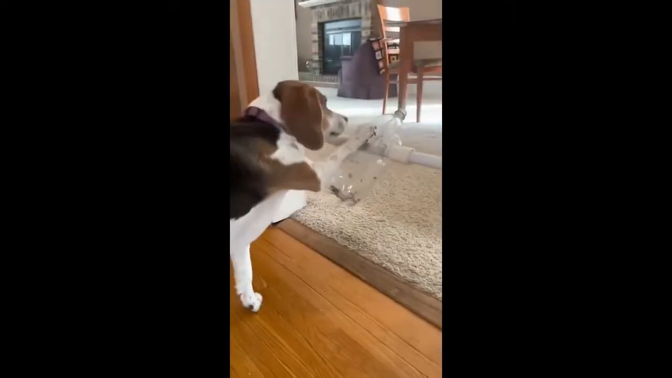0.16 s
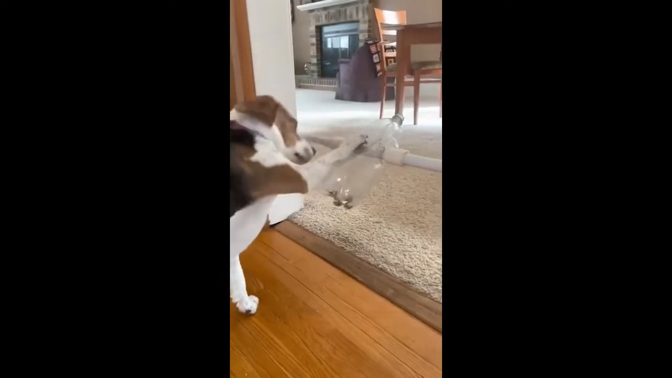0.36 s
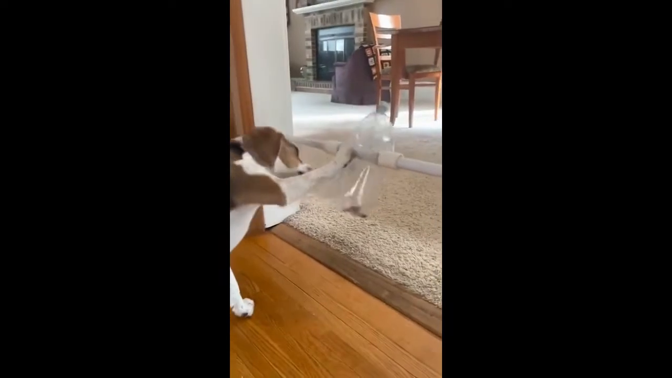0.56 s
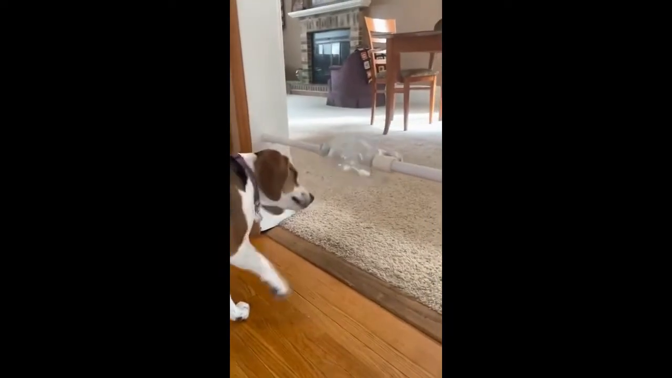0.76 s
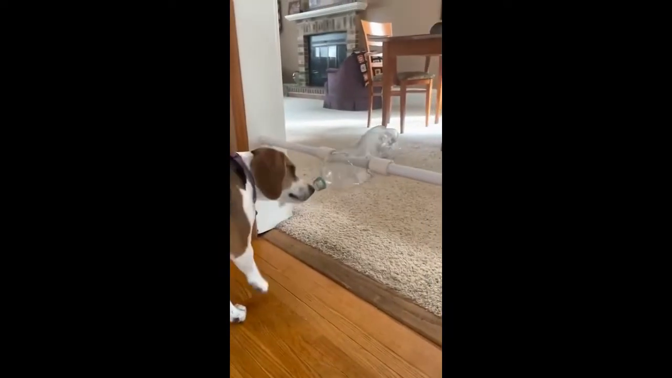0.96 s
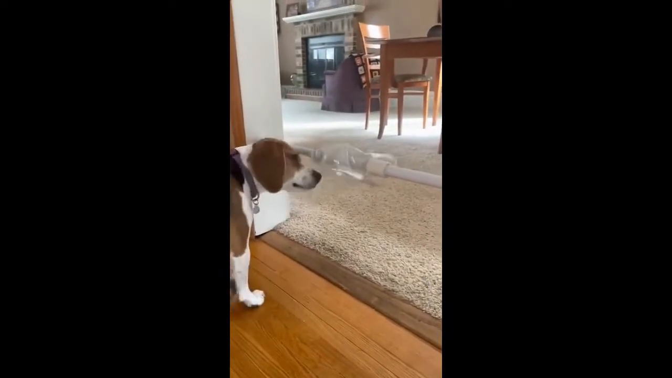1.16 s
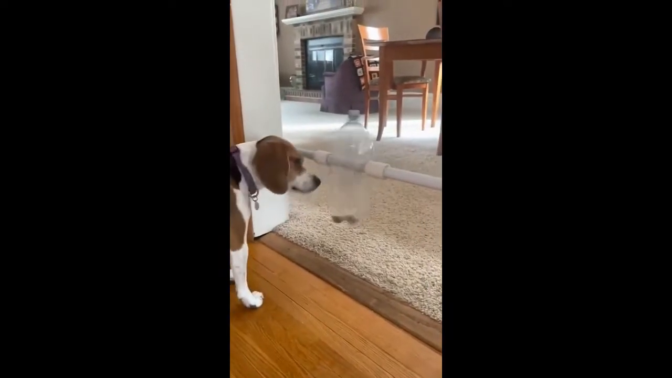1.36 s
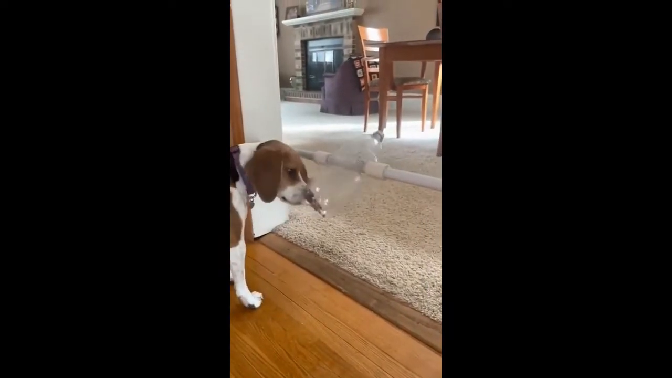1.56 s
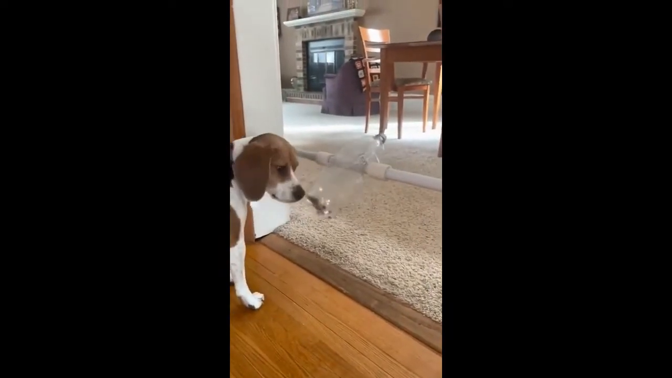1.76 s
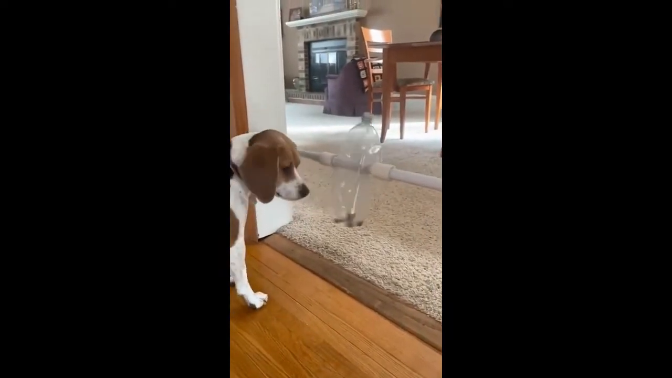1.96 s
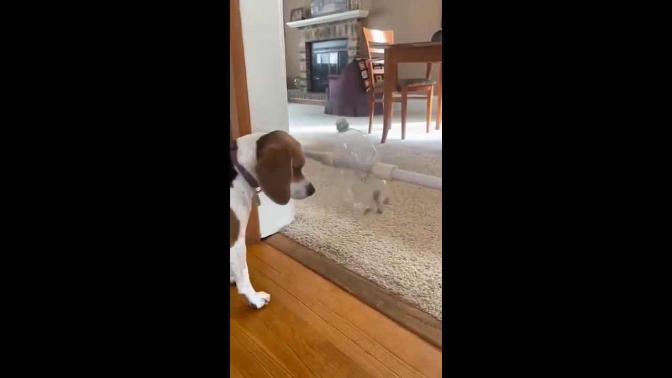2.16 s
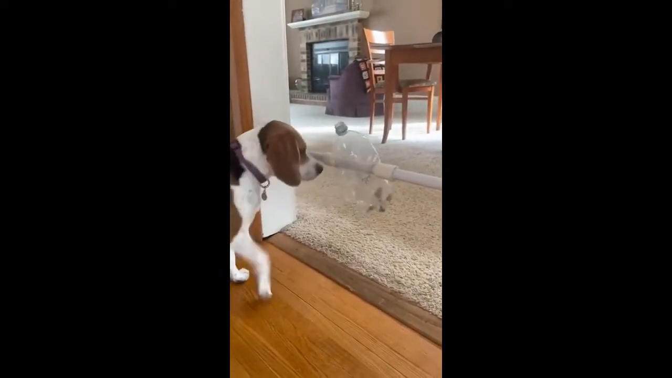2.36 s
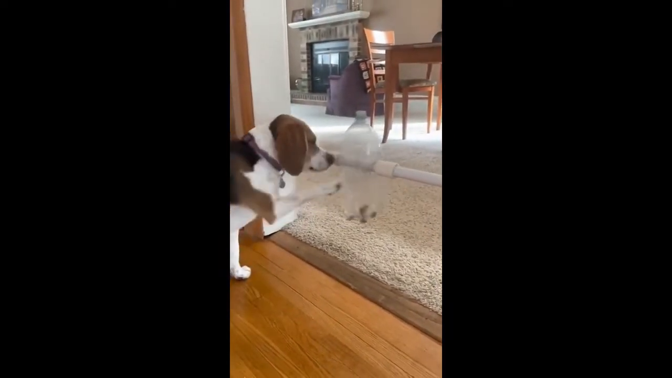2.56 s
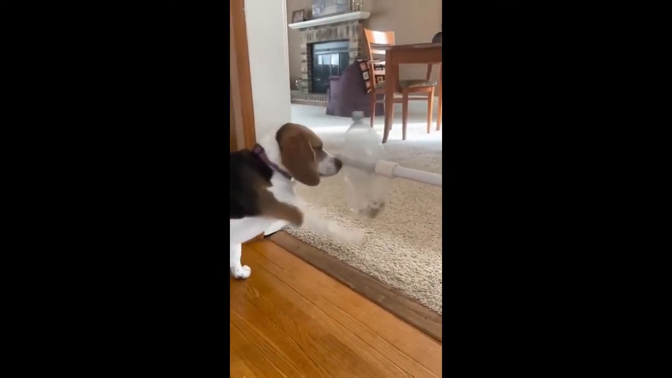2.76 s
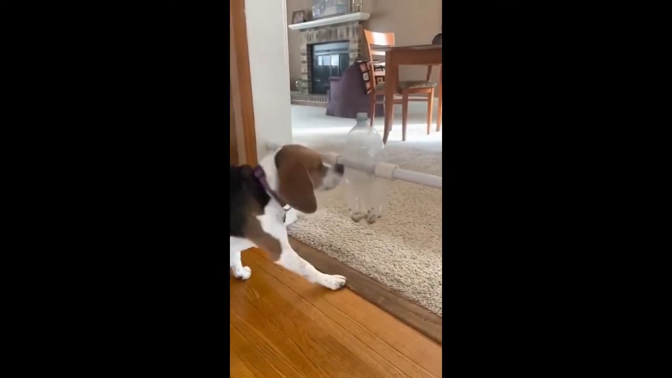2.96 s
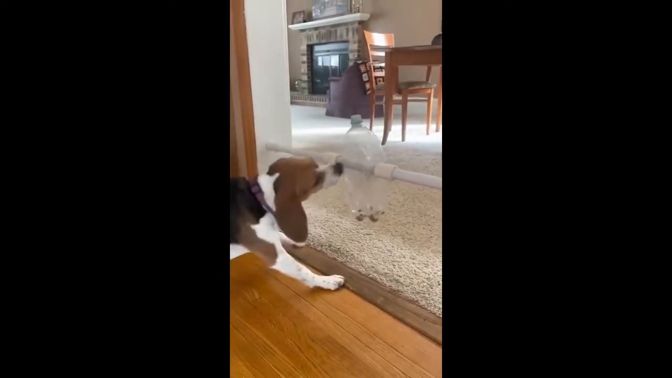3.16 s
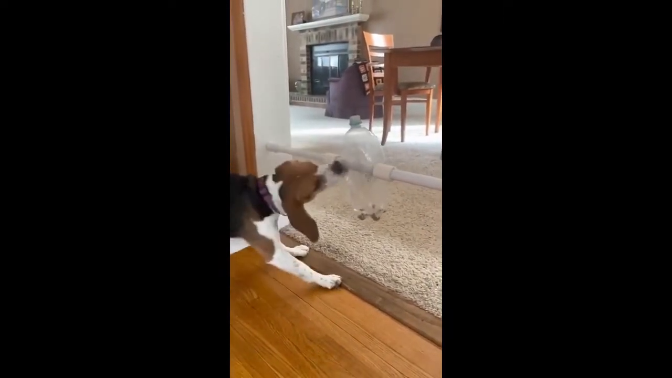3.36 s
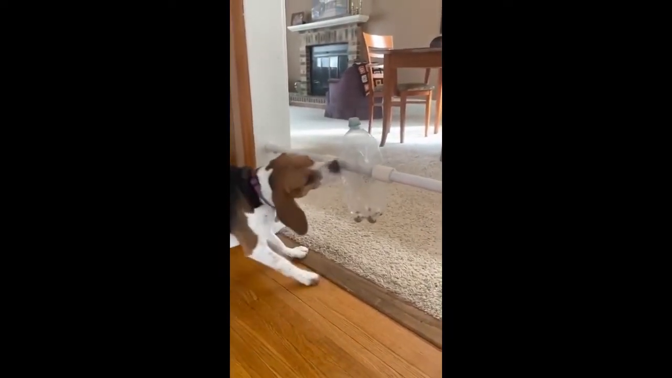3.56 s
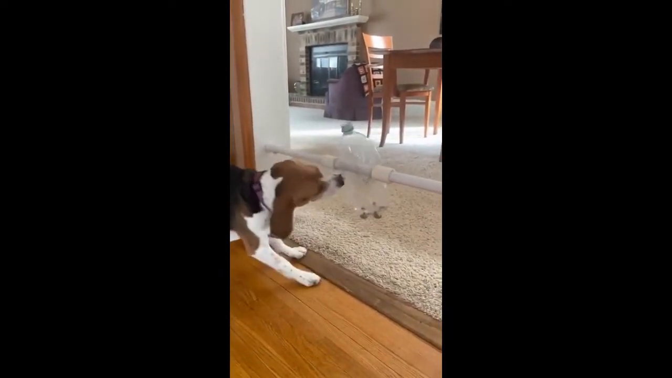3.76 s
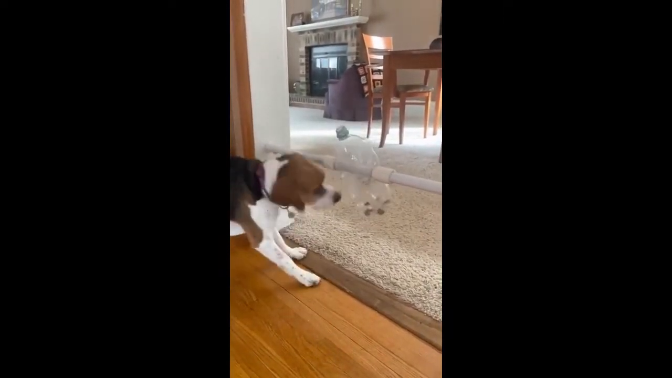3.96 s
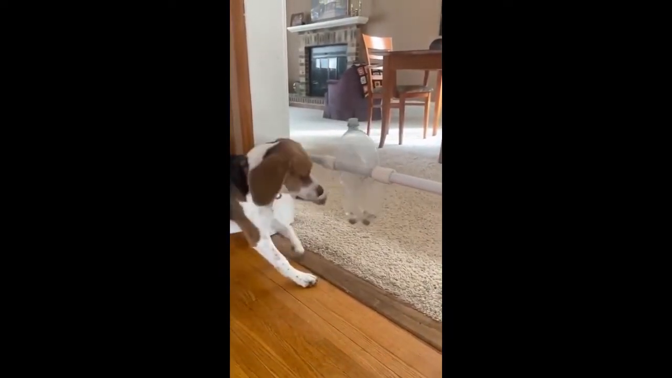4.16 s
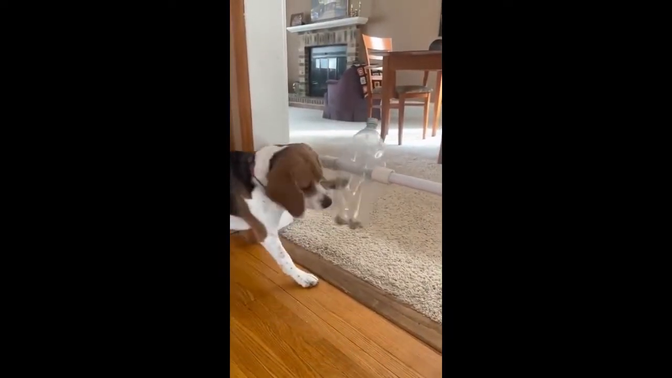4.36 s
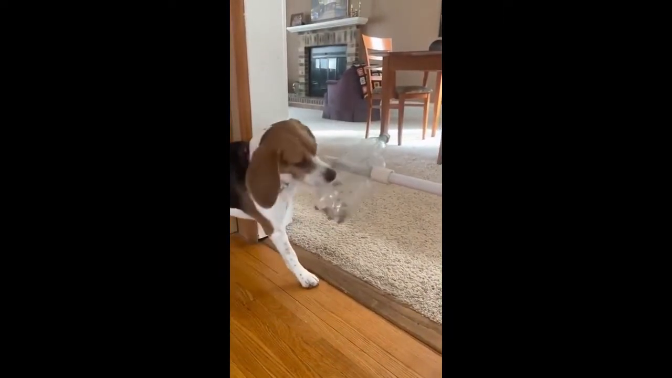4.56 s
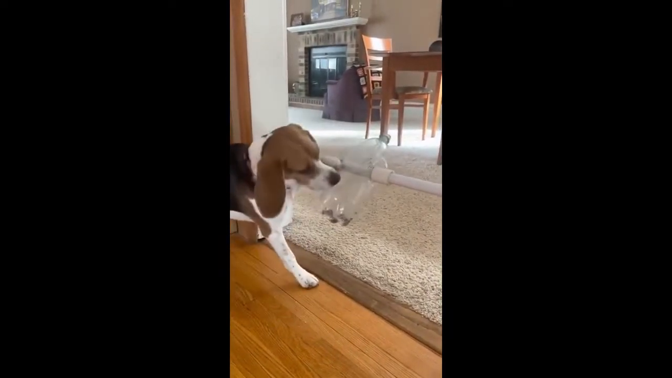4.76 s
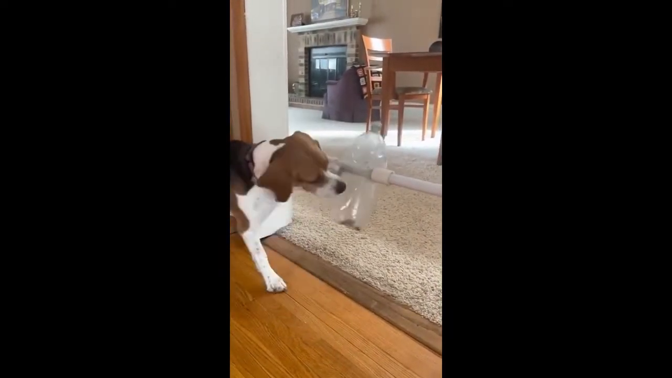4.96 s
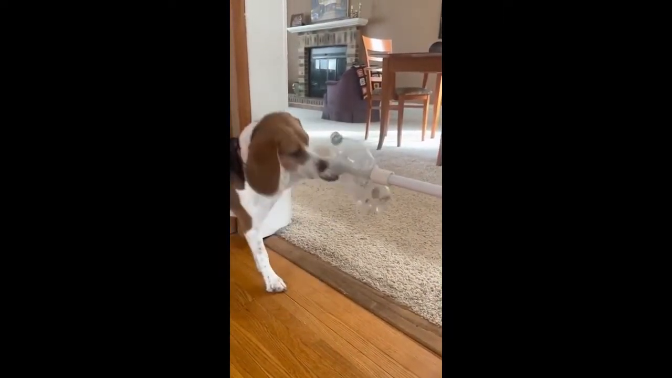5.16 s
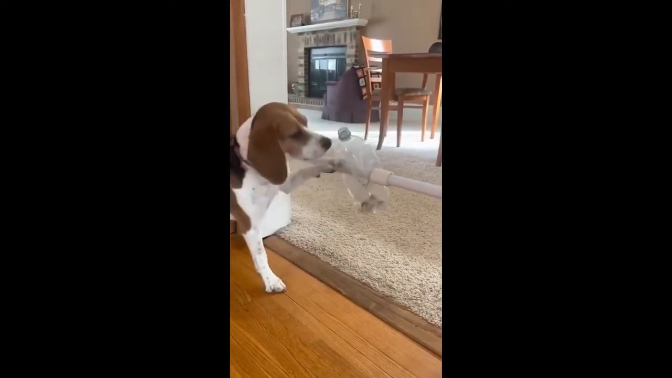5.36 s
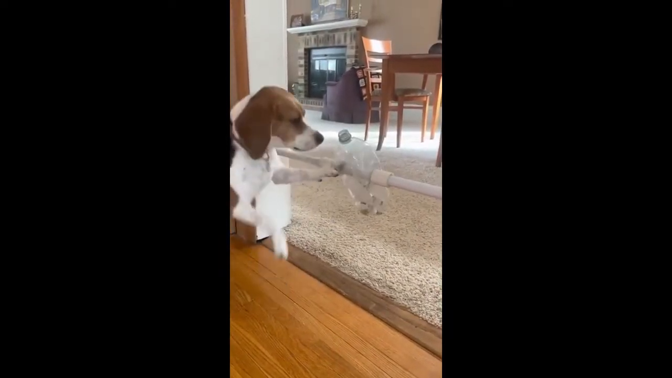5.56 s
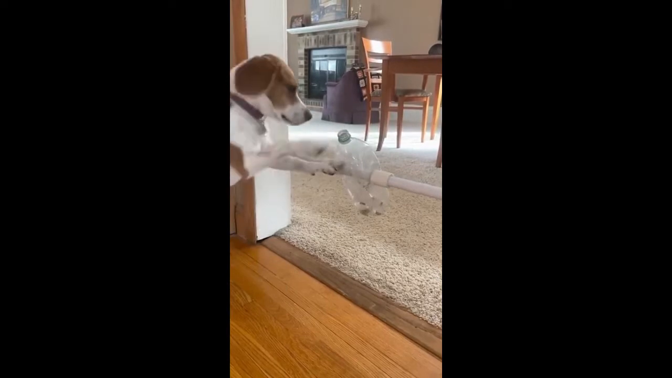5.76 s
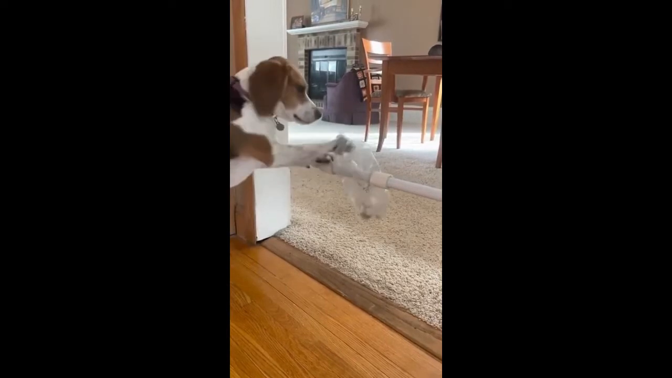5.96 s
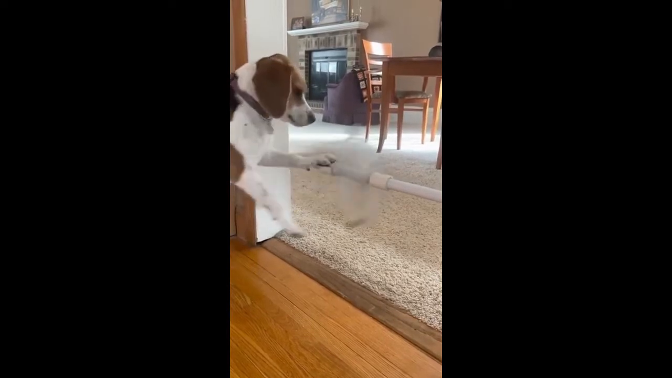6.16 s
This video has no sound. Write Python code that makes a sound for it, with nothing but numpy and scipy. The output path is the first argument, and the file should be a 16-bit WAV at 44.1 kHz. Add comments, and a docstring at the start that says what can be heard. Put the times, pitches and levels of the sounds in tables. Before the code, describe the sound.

Dry kibble tumbles and clatters in a plastic bottle as a dog bats it around a pipe, with hollow knocks and thuds indoors.

```python
"""A doorway in a carpeted room, on a small stereo microphone. In front, a dog paws a plastic bottle
that spins on a pipe across the doorway, and dry kibble tumbles against the bottle wall as it tips.
Paw and pipe knock the wall, the hollow pipe rings and the shaken frame rumbles.
Behind them are the room's short tail and the hum of an appliance motor."""
import sys
import numpy as np
from scipy import signal
from scipy.fft import rfft, irfft
from scipy.io import wavfile

SR = 44100
rng = np.random.default_rng(int(sys.argv[2]) if len(sys.argv) > 2 else 0)


def master(y):
    """Save y as 16-bit WAV."""
    cut = np.clip(np.atleast_2d(y).T, -1, 1)
    pcm = np.round(cut * 32767)  # scale
    wavfile.write(sys.argv[1], SR, pcm.astype(np.int16))


N = 273420

# knocks of paw and pipe on the bottle: (time [s], crack [dB], wall thud [dB], pipe ring [dB],
# contact time [s], hardness [dB], pitch the pipe favours [Hz])
KNOCKS = [(0.0366, -12, -12, -6.5, 0.0034, 5, 680), (0.0462, -7, -31, -11.5, 0.0042, -7, 885),
          (0.0645, -11.5, -22.5, -10.5, 0.011, -2.5, 820), (0.081, -20, -37, -11, 0.007, -3, 760),
          (0.0929, -11, -24, -12, 0.006, -2.5, 840), (0.154, -13.5, -52, -16.5, 0.0034, 7, 1780),
          (0.3511, -9, -42, -12, 0.0035, 1, 2170), (0.3895, -17.5, -27, -22, 0.0065, -6, 1110),
          (0.4458, -13, -22, -15, 0.0061, 4.5, 2170), (0.614, -8, -11.5, -15, 0.0076, -6.5, 470),
          (0.9436, -37, -63, -53, 0.0034, 4, 1000), (0.9562, -42, -60, -60, 0.005, 11, 1000),
          (1.006, -28.5, -57, -53, 0.0073, -2, 1200), (1.283, -30, -39, -42, 0.0044, 3, 1020),
          (2.0395, -43.5, -41, -61, 0.0032, 8.5, 936), (2.369, -39.5, -59, -36, 0.003, 1, 2490),
          (2.4157, -41, -56.5, -57, 0.0014, 2, 2200), (2.612, -31.5, -24, -23, 0.0076, -2, 750),
          (2.6501, -35.5, -23, -23.5, 0.014, 7.5, 380), (2.753, -23.5, -48, -48, 0.0073, 8.5, 2200),
          (2.8208, -27, -16, -44, 0.0097, 8.5, 2150), (2.872, -36, -21, -22, 0.0089, -2, 950),
          (2.9286, -29, -36, -53, 0.0026, 11, 1830), (2.989, -19.5, -32, -19.5, 0.0062, -0.5, 1020),
          (3.0475, -26, -55, -40, 0.0032, 4, 2200), (3.267, -53, -34.5, -72, 0.0055, 3, 855),
          (3.3001, -31.5, -26.5, -22.5, 0.0034, -12, 890), (3.441, -27.5, -34.5, -21, 0.0063, -16, 1016),
          (3.6635, -50.5, -58, -72, 0.0019, 9, 1000), (3.751, -43, -51, -56, 0.0022, 11, 2180),
          (3.8579, -13.5, -31, -10.5, 0.0038, -17, 1220), (3.9498, -14.5, -21.5, -13.5, 0.0055, -35, 1110),
          (4.3893, -24.5, -35, -25.5, 0.012, -11, 824), (4.408, -15.5, -15, -13, 0.012, -6, 980),
          (4.461, -22, -31, -16.5, 0.0055, -1, 880), (4.5297, -21.5, -22, -20, 0.01, -5, 835),
          (4.612, -20.5, -27, -15, 0.0057, 1, 820), (4.6373, -36, -12.5, -13.5, 0.0082, -5, 674),
          (4.688, -27.5, -34.5, -31, 0.004, 6.5, 735), (4.7327, -29, -21, -14.5, 0.0083, -17, 1130),
          (4.796, -23, -19, -18.5, 0.0062, -0.5, 930), (4.9831, -28, -23, -51, 0.01, -0.5, 800),
          (5.0542, -27, -29, -40.5, 0.01, -3.5, 1830), (5.272, -26, -22.5, -18, 0.016, -14, 400),
          (5.425, -26.5, -53, -35, 0.0021, 11.5, 2150), (5.863, -47.5, -62, -59, 0.006, 3.5, 1830),
          (5.886, -38.5, -40, -28, 0.01, 6, 860), (5.993, -22.5, -41, -28, 0.0061, 6, 2440),
          (6.0378, -20.5, -40, -22, 0.007, 3.5, 900), (6.1007, -38, -19, -17, 0.0039, 17.5, 820)]
# slides of kibble: (start [s], swell [s], level [dB], time to fade 20 dB [s], treble gain [dB])
KIBBLE_SLIDES = [(-.1, .13, -23, 0.31, 5.5), (.1, 0.25, -35.5, 0.28, -9), (.61, 0.025, -39.5, 0.3, -1),
                 (1.004, 0.02, -33, 0.39, -1), (1.01, 0.024, -31.5, 0.16, 3),
                 (1.2, .17, -34.5, 0.1758, 2.5), (1.5, 0.25, -55.5, 0.03, -6), (1.73, 0.1, -34, 0.16, 1.5),
                 (2.36, 0.034, -56.5, .2, 2.5), (2.61, 0.016, -38, 0.36, 7), (2.62, 0.11, -30.5, 0.23, 3),
                 (2.8, 0.066, -30.5, 0.263, 5), (3.44, 0.012, -52.5, 0.28, 7), (3.8, 0.031, -47, 0.3, 0.5),
                 (3.94, .15, -37.5, 0.05, 8), (4.388, 0.01, -32, 0.33, -1), (4.4, 0.047, -30.5, 0.24, 2),
                 (4.47, .07, -28, 0.25, -3), (4.56, 0.11, -31, 0.29, 0.5), (4.88, 0.077, -37.5, 0.23, 6),
                 (5.14, .11, -36, 0.12, 4.5), (5.33, 0.043, -29, 0.0555, 3.5), (5.41, 0.049, -31, 0.1, 3),
                 (5.5, .12, -47, .13, 8), (5.885, 0.011, -38.5, 0.7, 1), (5.965, 0.018, -29.5, 0.35, -5)]
# shoves of the paw: (start [s], swell [s], level [dB], time to fade 20 dB [s], bass gain [dB])
PAW_SHOVES = [(-.05, 0.057, -21.5, 0.12, 0), (.03, 0.061, -33, 0.02, -13), (.14, 0.079, -43.5, .18, -10),
              (.34, .04, -47.5, 0.7, -12), (.64, 0.046, -33.5, 0.25, -2), (1.02, 0.041, -37.5, 0.29, -5.5),
              (2.608, 0.021, -34, 0.4, 2.5), (2.78, 0.072, -36, 0.22, 4), (2.95, 0.057, -42, 0.2, 6),
              (3.25, 0.03, -41.5, 0.25, 4.5), (3.53, 0.03, -50, 0.55, 8), (3.72, 0.16, -39.5, 0.16, 3),
              (3.948, 0.011, -30.5, 0.15, 0), (4.39, 0.011, -26.5, 0.4, 3.5), (4.44, 0.096, -28, 0.41, 1),
              (4.58, 0.075, -27, 0.16, -1), (4.9, 0.087, -37.5, .2, 7), (4.98, 0.11, -36, 0.22, 4),
              (5.19, 0.029, -26.5, 0.2348, 2.5), (5.885, 0.019, -31, 0.3, 2), (6.0, 0.16, -26.5, 0.47, 2.5)]
# kibble and knocks on the bottle wall, with the microphone's treble dip and shelf:
# (frequency [Hz], relative level [dB])
WALL_AND_MIC_SPECTRUM = [(200, -29), (400, -20), (800, -6.5), (1300, -8.5), (2000, -5.5), (4900, -9.5),
                         (6400, -11.5), (7600, -28.5), (8700, -23), (12500, -30.5), (13600, -43),
                         (15800, -40)]
# modes of the bottle wall: (frequency [Hz], width [Hz], peak [dB])
WALL_MODES = [(459, 52, 14), (911, 45, 7.5), (1037, 21, 6.5), (1825, 44, 8.5), (2194, 55, 3.5),
              (5120, 310, 2), (6500, 190, -2.5)]
# rumble of the frame: (frequency [Hz], relative level [dB])
FRAME_SPECTRUM = [(40, -4.5), (65, 1), (120, 1), (210, 2), (380, 1), (540, -0.5), (800, -2), (1200, -10.5),
                  (2500, -47)]
# modes of the bottle's air and the frame: (frequency [Hz], width [Hz], peak [dB])
HOLLOW_MODES = [(255, 60, 3), (377, 42, 4.5), (535.3, 29, 8.5)]
# modes of the pipe: (frequency [Hz], relative level [dB], t60 [s])
PIPE_MODES = [(380, -2, 0.12), (506, -3.5, 0.05), (701.6, -0.5, .045), (820, -1, 0.058), (984, -4, 0.063),
              (1027.7, -7, 0.11), (1064, -3, 0.052), (1196, -3.5, 0.043), (1825, -4, 0.03),
              (2170, 0.5, 0.042), (2504, -1.5, .03)]
# tones of the appliance motor: (frequency [Hz], level ahead of the microphone [dB])
MOTOR_TONES = [(54.2, -58), (59.0, -50.5), (121.9, -57.5), (216.8, -61)]
# room tone: (frequency [Hz], relative level [dB])
AIR_SPECTRUM = [(30, 1), (69, 17), (167, 3), (462, -2.5), (691, -27), (978, -16), (1420, -22), (5280, -45),
                (12800, -56.5), (15000, -73)]
# the room's tail: (frequency [Hz], t60 [s], level [dB])
ROOM_DECAY = [(60, 0.18, -39), (374, 0.099, -11), (1460, 0.28, -4.5), (5150, 0.12, -2.5),
              (9100, 0.049, 2.5), (14700, 0.11, 4)]
# shading of the microphone's left port: (frequency [Hz], left minus right [dB])
LEFT_SHADE = [(150, 0.), (350, -2.), (700, -3.5), (1400, -2.3), (2800, -.6), (9000, 0.)]

CRACK_ATTACK_S, THUD_ATTACK_S, PIPE_ATTACK_S = 0.0016, 0.0032, 0.0017
SWELL_POWER, FADE_POWER = 1.09, 1.265   # swells start gently, fades steepen
MODE_WANDER = .015   # share by which a mode's pitch differs from spot to spot
OFF_PITCH_DB_PER_OCTAVE = 22   # pipe modes away from the favoured pitch ring less


def from_db(db):
    """Decibels to gain."""
    return 10 ** (np.asarray(db) / 20)


def rms_one(x):
    """Scale to unit rms."""
    return x / np.sqrt(np.mean(x ** 2) + 1e-20)


def at_hz(table, hz, column=1):
    """Read a table on a log-frequency axis."""
    table = np.array(table)
    return np.interp(np.log(hz), np.log(table[:, 0]), table[:, column])


def filtered(x, hz, kind, order=2):
    """Butterworth filter."""
    return signal.sosfilt(signal.butter(order, hz, kind, fs=SR, output="sos"), x)


def through(x, response):
    """Pass a signal through an impulse response."""
    return signal.oaconvolve(x, response)[:N]


def drift(rate_hz):
    """Slow random wander of unit rms."""
    step = 40
    pole = np.exp(-2 * np.pi * rate_hz * step / SR)
    slow = signal.lfilter([1], [1, -2 * pole, pole * pole], rng.standard_normal(N // step + 2002))[2000:]
    return np.interp(np.arange(N) / step, np.arange(len(slow)), rms_one(slow))


def grains(per_s, spread_db):
    """Random clicks of uneven size, at unit rms."""
    sizes = from_db(spread_db * np.minimum(rng.exponential(1, N), 4)) * rng.choice([-1, 1], N)
    return rms_one(sizes * (rng.random(N) < per_s / SR))


def body(spectrum, modes=(), scatter_db=0, size=8192):
    """Causal impulse response of unit energy with this spectrum and these mode peaks."""
    hz = np.maximum(np.arange(size // 2 + 1) * SR / size, 1)
    level = at_hz(spectrum, hz)
    for mode_hz, width, db in modes:
        mode_hz *= 1 + MODE_WANDER * rng.standard_normal()
        level += (db + scatter_db * rng.standard_normal()) / (1 + (2 * (hz - mode_hz) / width) ** 2)
    cepstrum = irfft(np.log(from_db(level)))
    cepstrum[1:size // 2] *= 2   # folding the cepstrum gives minimum phase
    cepstrum[size // 2 + 1:] = 0
    response = irfft(np.exp(rfft(cepstrum)))[:size // 2]
    return response / np.linalg.norm(response)


def strike_spots(strikes, spectrum, modes, hold_samples):
    """Strikes wander over six spots of a body, each with its own mix of modes."""
    spot = rng.integers(0, 6, N // hold_samples + 1).repeat(hold_samples)[:N]
    return sum(through(strikes * (spot == k), body(spectrum, modes, scatter_db=3.0)) for k in range(6))


def swells(rows, rest_db, step=32):
    """Level and colour in dB of rows that swell and fade over a resting level; loud rows set the colour."""
    start_s, swell_s, db, fade_s, colour_db = np.transpose(rows)[:, :, None]
    age = np.arange(0, N + step, step) / SR - start_s
    rise = np.clip(age / swell_s, 0, 1) ** SWELL_POWER
    fall_db = 20 * (np.maximum(age - swell_s, 0) / fade_s) ** FADE_POWER
    power = (rise * from_db(db - fall_db)) ** 2
    total = power.sum(axis=0) + from_db(rest_db) ** 2
    colour = (power * colour_db).sum(axis=0) / total
    grid = np.arange(N) / step, np.arange(len(total))
    return np.interp(*grid, 10 * np.log10(total)), np.interp(*grid, colour)


def room_tone():
    """Quiet air far in the background; above the bass it differs between left and right."""
    shared, side = [from_db(-54) * through(rng.standard_normal(N), body(AIR_SPECTRUM)) for _ in range(2)]
    return shared + from_db(-6.5) * filtered(side, 400, "high") * [[1], [-1]]


def appliance_hum():
    """A motor in the background: wavering tones, the lowest two close enough to beat."""
    t = np.arange(N) / SR - .03
    hum = np.zeros(N)
    for hz, db in MOTOR_TONES:
        amplitude = np.sqrt(2) * from_db(db + 1.1 * drift(1.7))
        hum += amplitude * np.cos(2 * np.pi * hz * t + 0.22 * drift(1.0))
    return hum


def room_tail(direct):
    """Diffuse reflections reach each side of the microphone separately and die band by band."""
    age, tails = np.arange(SR // 2) / SR, np.zeros((2, SR // 2))
    for hz in 63 * 2. ** np.arange(0, 8, .5):
        band = filtered(rng.standard_normal(tails.shape), [hz / 2 ** .25, hz * 2 ** .25], "band")
        t60 = max(at_hz(ROOM_DECAY, hz), .05)
        fade = from_db(at_hz(ROOM_DECAY, hz, column=2) - 60 * age / t60) * np.minimum(age / 0.0028, 1)
        tails += band * fade * np.sqrt(6 * np.log(10) / (t60 * SR))   # a longer decay adds no energy
    return np.array([through(direct, tail) for tail in tails])


def knock_contacts(hard, length=2048):
    """Each knock is a scuffle of contacts dying over its contact time: a crack if hard, else a thud."""
    out, age = np.zeros(N + length), np.arange(length) / SR
    attack = np.minimum(age / (CRACK_ATTACK_S if hard else THUD_ATTACK_S), 1)
    for time_s, crack_db, thud_db, _, contact_s, hardness_db, _ in KNOCKS:
        noise = rng.standard_normal(length)
        if hard:   # claw or pad: more or less treble
            dull = filtered(noise, 4000, "low")
            noise = dull + from_db(hardness_db) * (noise - dull)
        envelope = from_db(crack_db if hard else thud_db) * attack * np.exp(-age / contact_s)
        start = round(time_s * SR)
        out[start:start + length] += envelope * noise
    return out[:N]


def frame_rumble():
    """Paw drag and thuds shake the frame and the air in the bottle."""
    level_db, bass_db = swells(PAW_SHOVES, rest_db=-59)
    shake = from_db(level_db + 2 * drift(20)) * grains(1400, spread_db=2.5)
    shake += knock_contacts(hard=False)
    shake += (from_db(bass_db) - 1) * filtered(shake, 270, "low")
    return strike_spots(shake, FRAME_SPECTRUM, HOLLOW_MODES, hold_samples=2000)


def pipe_ring():
    """Each knock sets the hollow pipe ringing, most at the modes its spot favours."""
    time_s, _, _, ring_db, _, _, favoured_hz = np.transpose(KNOCKS)
    out, rise = np.zeros(N), np.exp(-1 / (PIPE_ATTACK_S * SR))
    for hz, db, t60 in PIPE_MODES:
        strikes = np.full(N, 1e-18)
        off_pitch_db = OFF_PITCH_DB_PER_OCTAVE * np.abs(np.log2(hz / favoured_hz))
        strikes[np.round(time_s * SR).astype(int)] = from_db(ring_db + db - off_pitch_db)
        decay, w = from_db(-60 / (t60 * SR)), 2 * np.pi * hz / SR
        ring = signal.lfilter([0, np.sin(w)], [1, -2 * decay * np.cos(w), decay ** 2], strikes)
        # a second, broad resonance lets the ring build over a few cycles
        out += signal.lfilter([1 - rise, 0, rise - 1], [1, -2 * rise * np.cos(w), rise ** 2], ring)
    return out


def bottle_rattle():
    """Tumbling kibble and knocks strike the plastic wall; the microphone colours their treble."""
    level_db, treble_db = swells(KIBBLE_SLIDES, rest_db=-71.5)
    pieces = grains(2800, spread_db=3.5)
    tumble = from_db(level_db + 1.85 * drift(20)) * pieces
    tumble += (from_db(treble_db) - 1) * filtered(tumble, 7500, "high")   # hard fast pieces reach higher
    strikes = tumble + knock_contacts(hard=True)
    return strike_spots(strikes, WALL_AND_MIC_SPECTRUM, WALL_MODES, hold_samples=700)


def scene():
    """Bottle, frame and pipe in front; the room and the appliance behind."""
    toy = bottle_rattle() + frame_rumble() + pipe_ring()
    return toy + room_tail(toy) + appliance_hum() + room_tone()


def record(dry):
    """Stereo microphone: the left port is shaded in the middle range; deep bass and the top are cut."""
    half_db = at_hz(LEFT_SHADE, np.maximum(np.arange(257) * SR / 512, 1)) / 2
    shades = [np.roll(irfft(from_db(db)), 256) for db in (half_db, -half_db)]
    ports = [signal.oaconvolve(side, shade)[256:256 + N] for side, shade in zip(dry, shades)]
    ports = filtered(ports, 46, "high", order=6)   # small capsules lose the deep bass
    return signal.sosfilt(signal.cheby2(12, 70, 15900, fs=SR, output="sos"), ports)


dry = scene()
out = record(dry)
master(out)
```